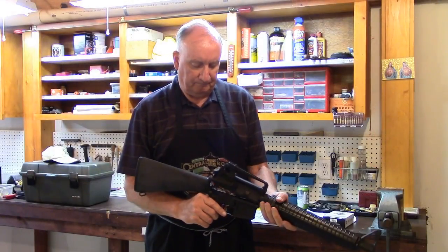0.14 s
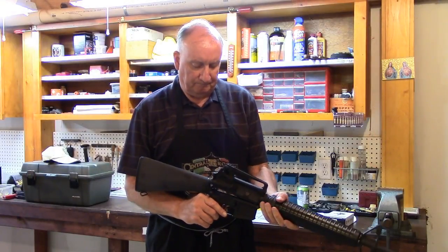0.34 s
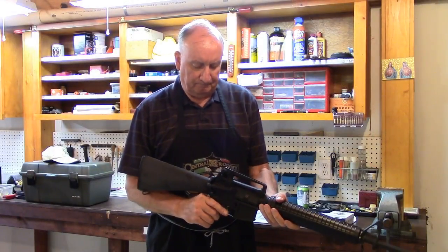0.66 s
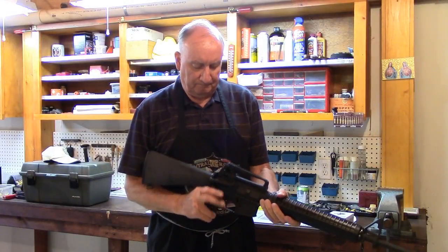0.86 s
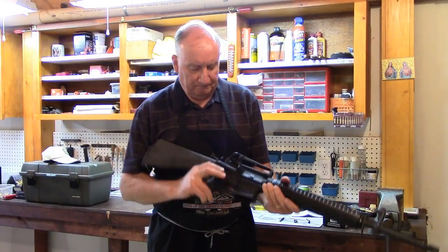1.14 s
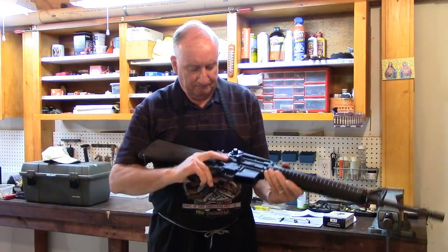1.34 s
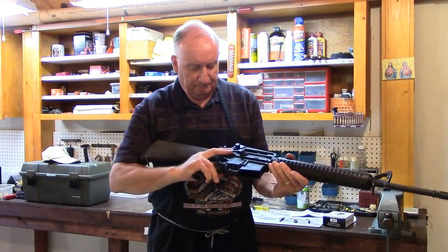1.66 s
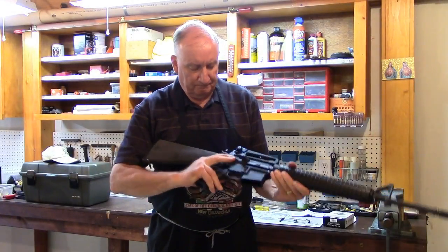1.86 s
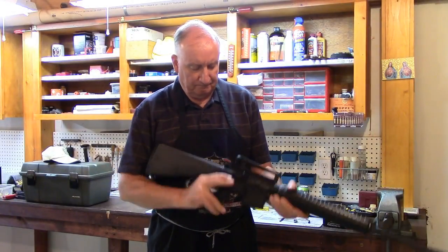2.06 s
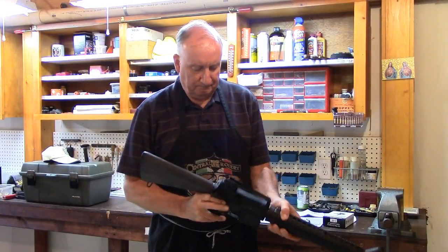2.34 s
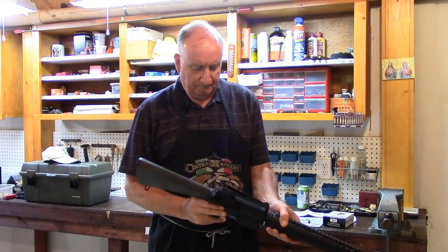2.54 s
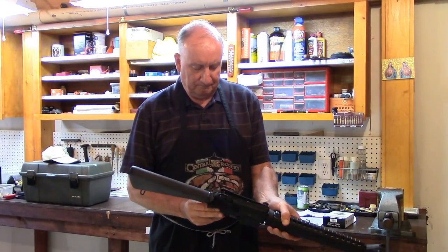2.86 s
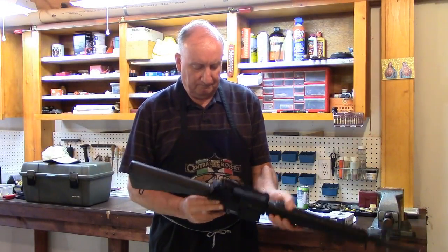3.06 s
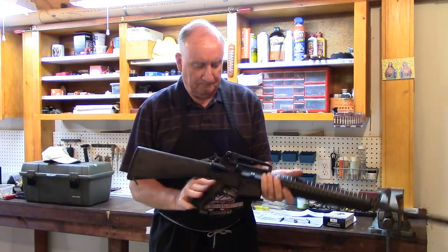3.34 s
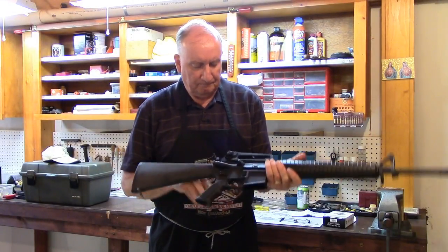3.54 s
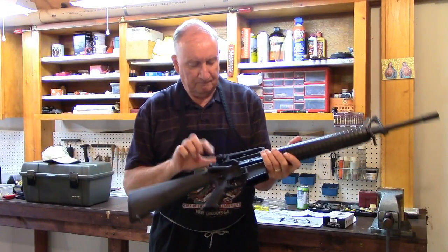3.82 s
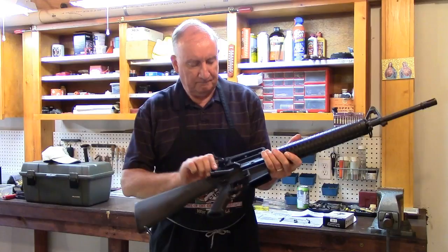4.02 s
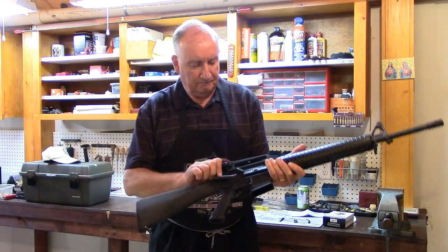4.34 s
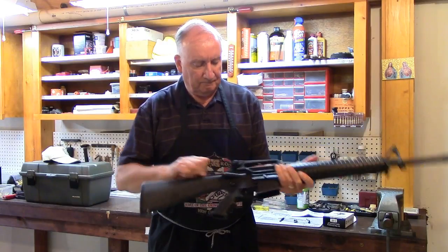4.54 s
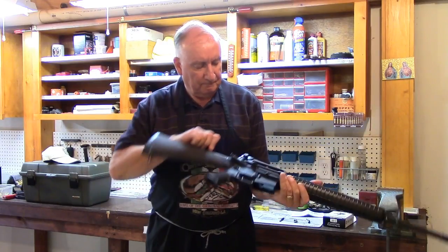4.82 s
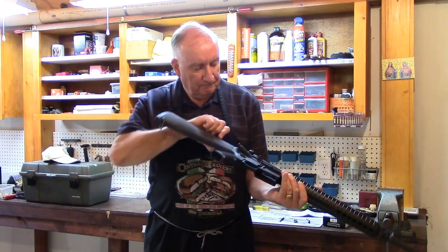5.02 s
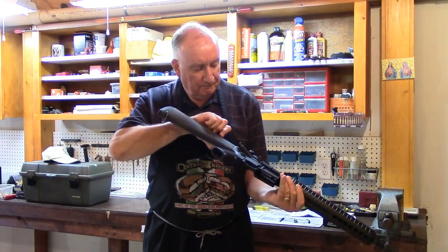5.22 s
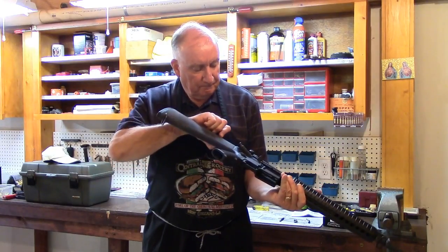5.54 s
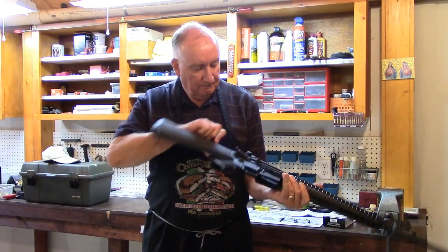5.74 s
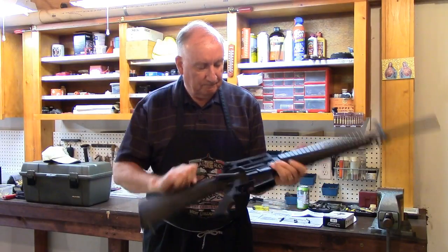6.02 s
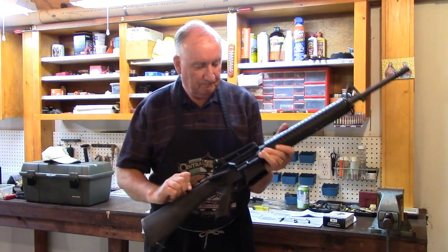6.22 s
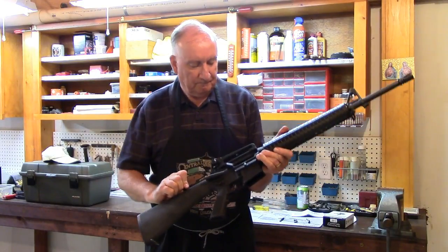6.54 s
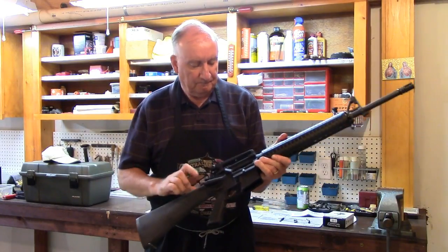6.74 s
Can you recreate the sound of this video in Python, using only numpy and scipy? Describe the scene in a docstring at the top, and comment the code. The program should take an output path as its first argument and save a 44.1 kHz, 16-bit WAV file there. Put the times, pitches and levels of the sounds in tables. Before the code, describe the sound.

Sharp metal clicks and clacks as a rifle is closed and its action worked by hand, with quiet room hum between.

```python
"""A rifle is closed and worked by hand at a workshop bench, over a quiet hum and a faint whine.
The receivers rub at the hinge and knock shut (0.5 s); a pin and its detent snap home (2.3 s).
Palms shift on the stock, the charging handle clicks (3.9 s), the bolt carrier slides, the latch lets go
and the carrier slams forward (4.5 s). Last, the spring is pulled and jolted, and rings (6.6 s).
Blows are bursts of tiny contacts, rubs are stick-slip ticks; shelves and walls answer each."""
import sys
import numpy as np
from scipy import signal
from scipy.fft import rfft, irfft
from scipy.io import wavfile
from scipy.ndimage import uniform_filter1d, minimum_filter1d

SR = 44100
rng = np.random.default_rng(int(sys.argv[2]) if len(sys.argv) > 2 else 0)


def wrap_up_sound(samples):
    """Save the sound to the file named by the first command line argument, as 16-bit audio."""
    columns = np.atleast_2d(samples).T
    # keep every value between -1 and 1, then stretch to whole-number steps
    tamed = np.clip(columns, -1, 1)
    steps = np.round(tamed * 32767).astype(np.int16)
    wavfile.write(sys.argv[1], SR, steps)


N = 303518
T = np.arange(N) / SR
RING_SAMPLES = 8192
TILT_LOW_HZ, TILT_PIVOT_HZ, TILT_HIGH_HZ = 850, 2500, 7500  # hard edge: bright; flat face: dull
CHATTER_DOUBLING_DB = 23  # a blow this much lighter chatters twice as long

# Blows per part: (time [s], level before trim [dB], tilt [dB/octave])
RECEIVER_BLOWS = [ (.1997, -22.5, 1.3), (.2438, -26.5, 0), (.2690, -31, 1.2), (.3930, -30.5, -2.5),
                  (.4040, -29.5, 7), (.4555, -34, -6), (.4602, -7.5, 3.5), (.4875, -17, 1),
                  (.5020, -39.5, -10), (.6430, -43, -1), (1.8340, -43, -1), (1.8885, -54, -5),
                  (2.9025, -39.5, -2), (3.0680, -39, 2), (3.4815, -42, -1), (4.2712, -38.5, 4),
                  (4.2972, -29.5, 3.5), (4.3460, -29, 3.5), (4.3740, -32.5, -4.5)]
PIN_BLOWS = [(2.2608, -26, -.5), (2.5130, -35, 0.64)]
DETENT_BLOWS = [(2.2693, -23.5, 0)]
STOCK_BLOWS = [(3.1705, -55.5, -.5), (3.2110, -56, -1.6), (6.1579, -38.5, 0)]
HANDLE_BLOWS = [(3.8688, -32.5, -.5), (4.1805, -41, -1), (4.3885, -36.5, 2)]
CATCH_BLOWS = [(4.0315, -48.5, 0)]
LATCH_BLOWS = [(4.4160, -20.5, 0.0066)]
CARRIER_BLOWS = [(4.5140, -17, 0.063)]
SPRING_BLOWS = [(6.6302, -26, 0.93), (6.6628, -10.5, 0.29), (6.6660, -25, 0.14)]

# Modes per part: (frequency [Hz], width [Hz], peak re flat background [dB])
RECEIVER_MODES = [(560, 130, -1), (885, 70, -2), (1000, 80, 5.5), (1465, 19, 7), (1650, 82, 1.5),
                  (2104, 170, 4), (3700, 90, 1)]
HINGE_MODES = [(1140, 270, -7), (1720, 840, 11.5), (3360, 350, 5)]
PIN_MODES = [(620, 90, 2), (940, 130, 0.63), (1800, 180, 5.2), (2700, 73, 1.7), (3200, 130, 3.5),
             (8950, 640, 0.67)]
DETENT_MODES = [(646, 160, 9.5), (1615, 260, -0.5), (1980, 330, 5.5), (2530, 58, 12), (2990, 80, 3.5),
                (8550, 380, 13.5), (9280, 700, 2.5), (11100, 450, -1)]
STOCK_MODES = [(716, 14, 22), (890, 30, 14), (1350, 106, 23.2), (1480, 190, 14), (1700, 43, 5),
               (1970, 230, 15)]
HANDLE_MODES = [(1518, 70, 4.1), (2015, 68, 5.8), (3270, 110, 1), (5340, 160, 4), (9450, 240, 14)]
CATCH_MODES = [(3520, 25, 16), (9150, 110, 18.5)]
LATCH_MODES = [(1476, 98, 2), (1900, 130, 2), (2975, 40, 13), (2912, 24, 13.5), (2950, 29, 11),
               (3330, 57, 2.5), (5895, 190, -0.5), (6200, 80, 4), (6950, 60, 3.5), (8930, 170, 7.5),
               (9970, 120, 1)]
CARRIER_MODES = [(281, 91, 7.8), (386, 39, 5.5), (1072, 78, 10), (1533, 57, 7), (1610, 146, 7.2),
                 (1670, 80, 2.7), (9060, 80, 4.4)]
SPRING_MODES = [(1420, 110, 11), (1746, 82, -11), (1880, 200, 8.5), (2170, 50, -8), (2470, 120, 4),
                (2886, 56, 14), (3340, 400, 7), (3900, 52, 2), (4050, 140, 7.5), (5480, 150, 7.5),
                (6370, 110, 0), (8250, 160, 0.5), (9300, 150, -17)]

# Sliding strokes: (start [s], length [s], level [dB], swell over the stroke [dB])
HINGE_STROKES = [(.407, .09, -31, -4.5)]
FITTING_STROKES = [(2.749, 0.0046, -50.5, -4), (2.785, .006, -54, 4)]
PALM_STROKES = [(3.15, .13, -55.5, -3.5), (3.42, 0.079, -62, 5), (3.59, .03, -64.5, 3.5)]
CARRIER_STROKES = [(4.293, .115, -45, 15), (4.480, 0.035, -32.5, 12.2)]
SPRING_RELEASE_STROKES = [(4.426, .04, -20.5, 3.3)]
SPRING_PULL_STROKES = [(6.600, 0.023, -25.5, 1), (6.660, 0.076, -16.5, 0.93)]

# Friction spectra: (frequency [Hz], relative octave-band level [dB])
FITTING_COLOUR = [(200, -27.5), (1400, -6.5), (2150, 3.5), (3000, -16.5), (9000, -23)]
DRY_METAL_COLOUR = [(60, -42), (350, -18), (850, 2), (1600, 5.5), (3500, -0.5), (8000, 1.5), (11000, -11),
                    (16000, -26)]
PALM_COLOUR = [(60, -33.5), (600, -1), (1000, -5), (1550, -4), (2100, -1.5), (5000, -6.5), (8000, -4),
               (16000, -19)]
COIL_COLOUR = [(60, -56.5), (350, -20.5), (850, -5), (1180, -11.5), (1500, -1.5), (3400, 2.5), (4800, -1),
               (6200, 4.5), (7200, -0.5), (9600, 0.5), (10500, -6), (16000, -20.5)]

# Ventilation spectrum: (frequency [Hz], relative density [dB])
HUM_SPECTRUM = [(15, -57), (25, -39), (120, -10.5), (293, -2), (326, -3.5), (363, -2), (451, -3.5),
                (545, -3.5), (641, -3.5), (2160, -12.5), (5140, -20.5), (5730, -22), (6210, -22),
                (8590, -27), (16000, -41)]
# First reflections off bench, floor and shelves: (delay [s], level [dB])
EARLY_ECHOES = [(.005, -11), (.012, -15)]
# Wall reverberation: (frequency [Hz], T60 [s], level before trim [dB])
WALL_DECAY = [(150.5, .28, -13), (400, 0.35, -3.5), (1060, 0.32, -4.5), (2140, 0.38, -5), (4970, 0.3, -5),
              (9000, 0.33, -11), (15000, .29, -9.5)]


def amp(db):
    """Decibels to gain."""
    return 10 ** (np.asarray(db) / 20)


def unit(x):
    """Scale to rms 1."""
    return x / np.sqrt(np.mean(x ** 2))


def bins_hz(size):
    """FFT bin frequencies, floored at 1 Hz."""
    return np.maximum(np.arange(size // 2 + 1) * SR / size, 1)


def contour(points, f):
    """Gain through (Hz, dB) points on a log axis."""
    hz, db = np.transpose(points)
    return amp(np.interp(np.log(f), np.log(hz), db))


def per_octave(points, f):
    """Gain that gives white noise these octave-band levels."""
    return contour(points, f) * np.sqrt(SR / 2 / np.log(2) / np.maximum(f, points[0][0]))


def minimum_phase(gain):
    """Spectrum with this gain whose response starts at once and decays."""
    cepstrum = irfft(np.log(gain + 1e-9))
    half = len(cepstrum) // 2
    cepstrum[1:half] *= 2
    cepstrum[half + 1:] = 0
    return np.exp(rfft(cepstrum))


def resonance(modes, f):
    """Gain of a part: modal peaks over a flat background."""
    return np.sqrt(1 + sum(amp(db) ** 2 / (1 + (2 * (f - hz) / width) ** 2) for hz, width, db in modes))


def blows(table, modes, chatter_s, trim_db, thud_db, clack_db, snap_db,
          edge_db, air_db, top_db, rumble_db=-26):
    """Each blow: a decaying burst of tiny contacts that rings the part."""
    out = np.zeros(N + RING_SAMPLES)
    f, t = bins_hz(RING_SAMPLES), T[:RING_SAMPLES]
    colour = [(60, thud_db + rumble_db), (350, thud_db), (850, clack_db), (2500, .0089), (7500, snap_db),
              (9500, snap_db + edge_db), (11500, snap_db + air_db), (16000, snap_db + top_db)]
    octaves = np.log2(np.clip(f, TILT_LOW_HZ, TILT_HIGH_HZ) / TILT_PIVOT_HZ)
    firmest_db = max(db for _, db, _ in table)
    for time_s, db, tilt in table:
        decay_s = chatter_s * 2 ** ((firmest_db - db) / CHATTER_DOUBLING_DB)
        burst = rfft(rng.standard_normal(RING_SAMPLES) * np.exp(-t / decay_s))
        # burst spectrum is smoothed so the modes ring clearly on every blow
        ripple = np.sqrt(uniform_filter1d(np.abs(burst) ** 2, size=40))
        # each blow hits another spot: mode levels scatter
        struck = [(hz, width, peak_db - 2 * rng.standard_normal()) for hz, width, peak_db in modes]
        gain = per_octave(colour, f) * amp(tilt * octaves) * resonance(struck, f) / ripple
        ring = irfft(burst * minimum_phase(gain))
        start = int(time_s * SR)
        out[start:start + RING_SAMPLES] += 20 * amp(db + trim_db) * ring
    return out[:N]


def strokes(table, rise_db_per_s, fall_db_per_s):
    """Stroke pressure: sets in, swells or eases with travel, dies away."""
    pressure = np.zeros(N)
    for start_s, length_s, db, swell_db in table:
        before_s, after_s = np.maximum(start_s - T, 0), np.maximum(T - start_s - length_s, 0)
        travel = np.clip((T - start_s) / length_s, 0, 1)
        level_db = db + swell_db * travel - rise_db_per_s * before_s - fall_db_per_s * after_s
        pressure = np.maximum(pressure, amp(level_db))
    return pressure


def slide(pressure, colour, modes, ticks_per_s, scatter_db, hiss):
    """Stick-slip: rough faces catch in uneven ticks that ring the part."""
    ticks = (rng.random(N) < ticks_per_s / SR) * rng.choice([-1, 1], N)
    strength = amp(scatter_db * np.minimum(rng.exponential(size=N), 3))
    force = unit(unit(ticks * strength) + hiss * rng.standard_normal(N)) * pressure
    f = bins_hz(RING_SAMPLES)
    gain = unit(per_octave(colour, f) * resonance(modes, f))
    return signal.fftconvolve(force, irfft(minimum_phase(gain)))[:N]


def room_hum(level_db=-58):
    """Steady ventilation rumble and soft hiss."""
    spectrum = rfft(rng.standard_normal(N)) * contour(HUM_SPECTRUM, bins_hz(N))
    return amp(level_db) * unit(irfft(spectrum, N))


def electric_whine(pitch_hz=5600, level_db=-79, pulse_hz=7):
    """Faint tone, pulsing unevenly."""
    wander = unit(signal.sosfilt(signal.butter(2, 3, fs=SR, output="sos"), rng.standard_normal(N)))
    gate = np.clip(.5 + np.sin(2 * np.pi * pulse_hz * T + wander), 0, 1)
    return amp(level_db) * unit(gate * np.sin(2 * np.pi * pitch_hz * T + 2 * wander))


def loose_fittings(tick_db=-73.5):
    """Fittings tick while the rifle is held and slip as it tips."""
    ticks = slide(amp(tick_db), FITTING_COLOUR, [], ticks_per_s=9, scatter_db=1, hiss=0)
    pressure = strokes(FITTING_STROKES, rise_db_per_s=7999.5, fall_db_per_s=3997)
    return ticks + slide(pressure, FITTING_COLOUR, [], ticks_per_s=1600, scatter_db=9, hiss=1)


def receiver_knocks():
    """The receivers ring as they knock shut, are bumped in handling, and the sliding carrier catches."""
    return blows(RECEIVER_BLOWS, RECEIVER_MODES, chatter_s=.0036, trim_db=-9.5, thud_db=-17.5,
                 clack_db=2, snap_db=-10, edge_db=-3.5, air_db=-12.5, top_db=-31.5, rumble_db=-34)


def hinge_rub():
    """Dry metal turns in the hinge between the receivers."""
    pressure = strokes(HINGE_STROKES, rise_db_per_s=4009, fall_db_per_s=854)
    return slide(pressure, DRY_METAL_COLOUR, HINGE_MODES, ticks_per_s=3700, scatter_db=4.5, hiss=.74)


def pin_snaps():
    """The pin seats; its spring detent snaps in."""
    pin = blows(PIN_BLOWS, PIN_MODES, chatter_s=.009, trim_db=-5.5, thud_db=-15.5,
                clack_db=-.5, snap_db=2.5, edge_db=.5, air_db=-10, top_db=-13.5)
    detent = blows(DETENT_BLOWS, DETENT_MODES, chatter_s=.0009, trim_db=-2.5, thud_db=-24.5,
                   clack_db=-7, snap_db=1, edge_db=4.5, air_db=-3, top_db=-21.5, rumble_db=-34)
    return pin + detent


def stock_handling():
    """Palms slide as the grip changes; light knocks ring the stock."""
    pressure = strokes(PALM_STROKES, rise_db_per_s=152, fall_db_per_s=254)
    palms = slide(pressure, PALM_COLOUR, [], ticks_per_s=2600, scatter_db=7, hiss=.58)
    return palms + blows(STOCK_BLOWS, STOCK_MODES, chatter_s=.0043, trim_db=-4, thud_db=-26,
                         clack_db=-.5, snap_db=-2, edge_db=-4.5, air_db=-17, top_db=-19.5)


def handle_clicks():
    """The charging handle and its small catch click and ring."""
    handle = blows(HANDLE_BLOWS, HANDLE_MODES, chatter_s=.003, trim_db=-2.5, thud_db=-26,
                   clack_db=-9.5, snap_db=-1, edge_db=-9, air_db=-14, top_db=-21.5)
    catch = blows(CATCH_BLOWS, CATCH_MODES, chatter_s=.0088, trim_db=-.5, thud_db=-22.5,
                  clack_db=-3, snap_db=-1.5, edge_db=-7, air_db=-14, top_db=-22)
    return handle + catch


def carrier_rub():
    """The sliding bolt carrier rings the receivers."""
    pressure = strokes(CARRIER_STROKES, rise_db_per_s=1199, fall_db_per_s=1500.5)
    return slide(pressure, DRY_METAL_COLOUR, RECEIVER_MODES, ticks_per_s=850, scatter_db=2, hiss=.29)


def latch_release():
    """The latch snaps free; the released spring's coils scrape and ring it."""
    snap = blows(LATCH_BLOWS, LATCH_MODES, chatter_s=.0013, trim_db=2.5, thud_db=-15,
                 clack_db=-9, snap_db=11.5, edge_db=-4.5, air_db=-11, top_db=-16.5, rumble_db=-15.5)
    pressure = strokes(SPRING_RELEASE_STROKES, rise_db_per_s=2800.5, fall_db_per_s=505.5)
    return snap + slide(pressure, COIL_COLOUR, LATCH_MODES, ticks_per_s=3600, scatter_db=-3.5, hiss=.6)


def carrier_slam():
    """The carrier slams forward: long chatter, low modes."""
    return blows(CARRIER_BLOWS, CARRIER_MODES, chatter_s=.017, trim_db=-.5, thud_db=-9.5,
                 clack_db=1.5, snap_db=1.5, edge_db=-6.5, air_db=-9.5, top_db=-20, rumble_db=-51)


def spring_pull():
    """Scraping coils and three jolts ring the spring."""
    pressure = strokes(SPRING_PULL_STROKES, rise_db_per_s=750, fall_db_per_s=186)
    scrape = slide(pressure, COIL_COLOUR, SPRING_MODES, ticks_per_s=1300, scatter_db=2, hiss=.84)
    jolts = blows(SPRING_BLOWS, SPRING_MODES, chatter_s=.0033, trim_db=-5.5, thud_db=-13,
                  clack_db=-3.5, snap_db=5.5, edge_db=3.5, air_db=-6.5, top_db=-12, rumble_db=-28)
    return scrape + jolts


def room_response(gap_s=.0021, build_s=.0019, wall_trim_db=-2, scatter_s=.00027, size=32768):
    """Diffuse wall decay per band, plus scattered slaps off near surfaces."""
    t, f = T[:size], bins_hz(size)
    centres_hz = [hz for hz, _, _ in WALL_DECAY]
    noise, response = rfft(rng.standard_normal(size)), np.zeros(size)
    onset = 1 - np.exp(-np.maximum(t - gap_s, 0) / build_s)
    for share, (_, t60_s, db) in zip(np.eye(len(WALL_DECAY)), WALL_DECAY):
        decay = onset * amp(-60 * t / t60_s)
        band = irfft(noise * np.interp(np.log(f), np.log(centres_hz), share))
        response += amp(db + wall_trim_db) * band * decay / np.linalg.norm(decay)
    for delay_s, db in EARLY_ECHOES:
        slap = rng.standard_normal(size) * (t >= delay_s) * np.exp(-np.abs(t - delay_s) / scatter_s)
        response += amp(db) * slap / np.linalg.norm(slap)
    return response


def workshop(direct, cycle_hz=9, patterns=4):
    """Direct sound plus echoes; the echo patterns crossfade as the rifle moves."""
    out = direct
    for k in range(patterns):
        place = (T * cycle_hz * patterns - k) % patterns
        share = np.sin(np.pi * np.minimum(place, 2) / 2)
        out = out + signal.oaconvolve(direct * share, room_response())[:N]
    return out


def scene():
    """The rifle in the room, mono."""
    background = room_hum() + electric_whine()
    rifle = (loose_fittings() + receiver_knocks() + hinge_rub() + pin_snaps() + stock_handling()
             + handle_clicks() + carrier_rub() + latch_release() + carrier_slam() + spring_pull())
    return (background + workshop(rifle))[None]


def record(dry, ceiling=.98, cutoff_hz=16000):
    """Fast peak limiter, then a steep low-pass."""
    needed_gain = ceiling / np.maximum(np.abs(dry), ceiling)
    gain = uniform_filter1d(minimum_filter1d(needed_gain, size=65), size=33)
    lowpass = signal.ellip(10, .1, 80, cutoff_hz, fs=SR, output="sos")
    return signal.sosfilt(lowpass, dry * gain)


dry = scene()
out = record(dry)
wrap_up_sound(out)
```